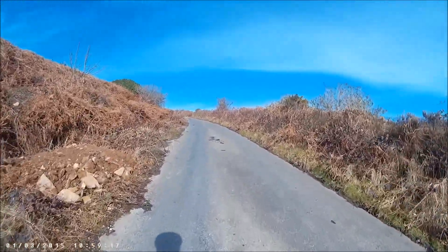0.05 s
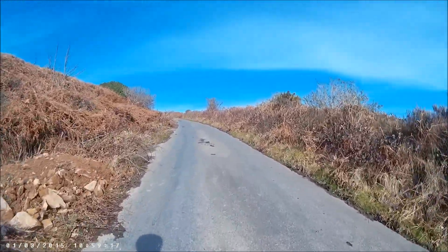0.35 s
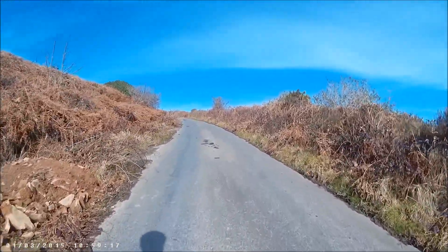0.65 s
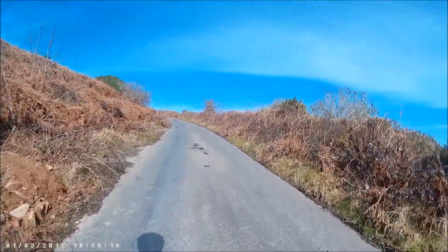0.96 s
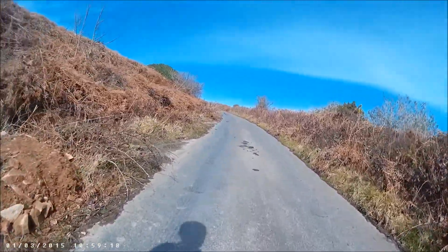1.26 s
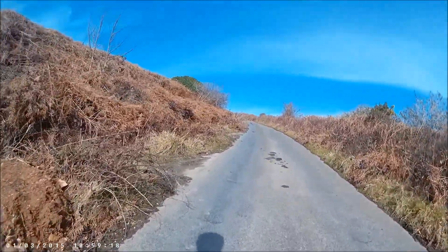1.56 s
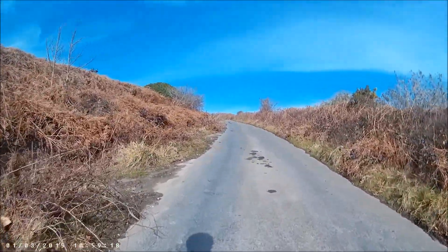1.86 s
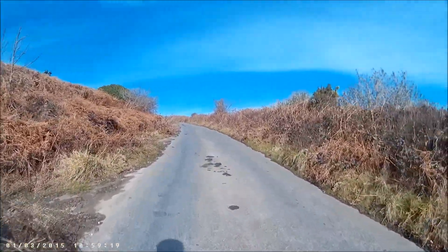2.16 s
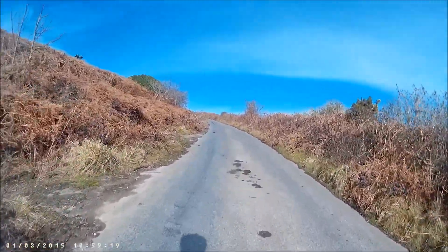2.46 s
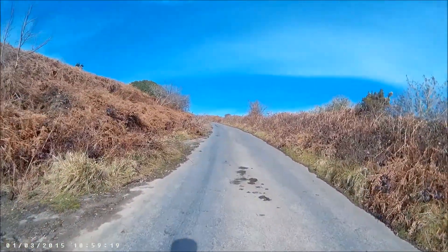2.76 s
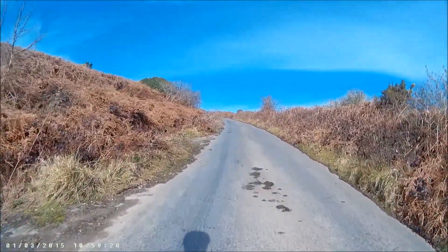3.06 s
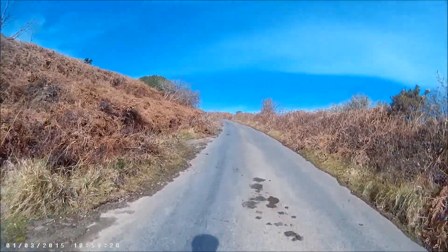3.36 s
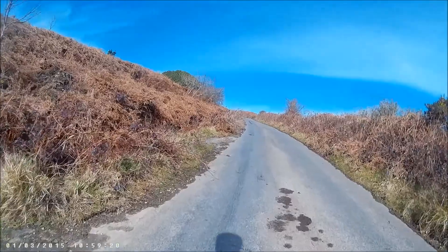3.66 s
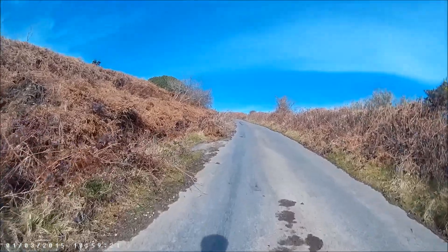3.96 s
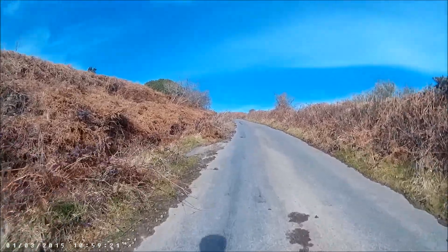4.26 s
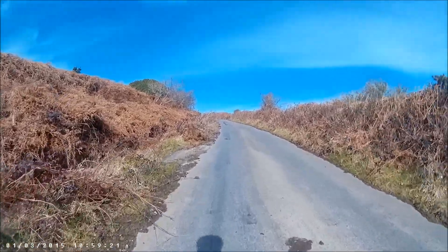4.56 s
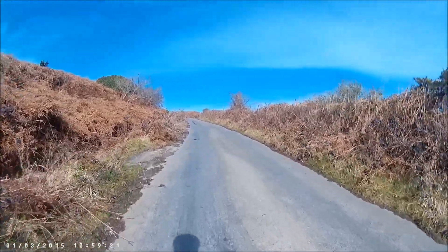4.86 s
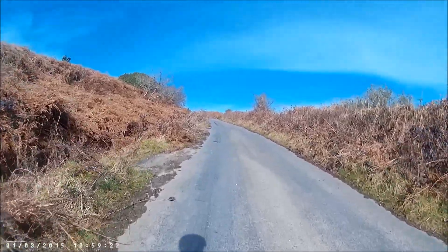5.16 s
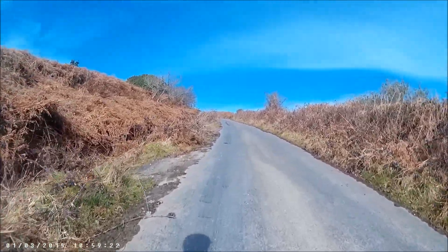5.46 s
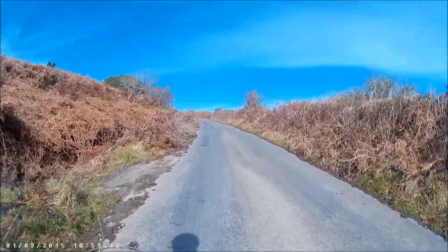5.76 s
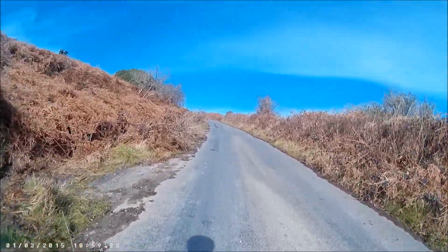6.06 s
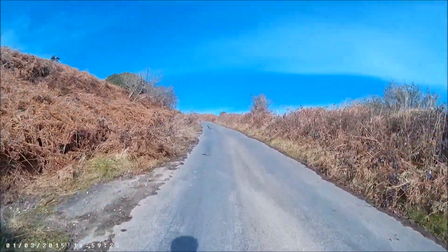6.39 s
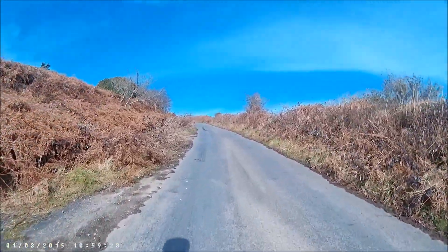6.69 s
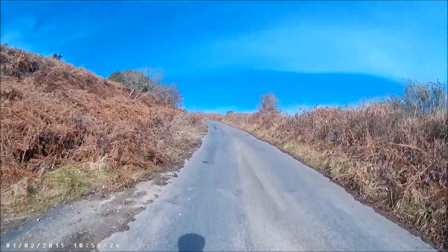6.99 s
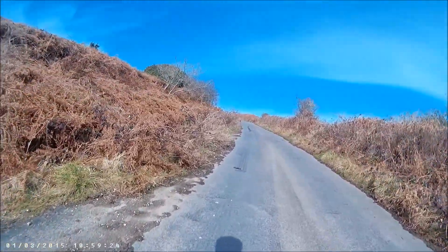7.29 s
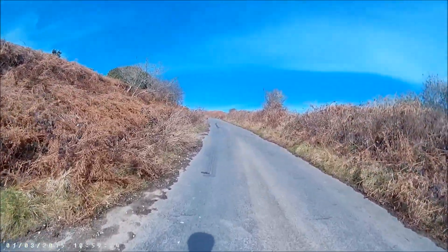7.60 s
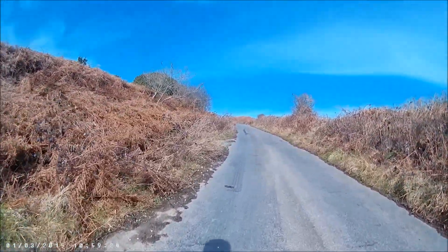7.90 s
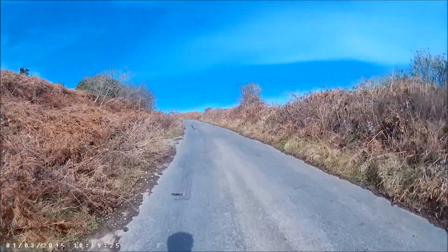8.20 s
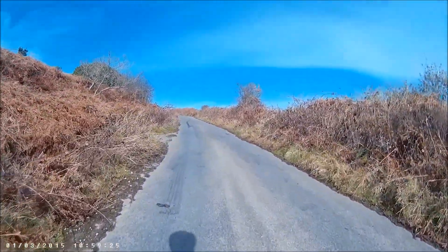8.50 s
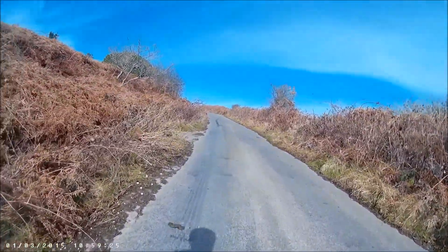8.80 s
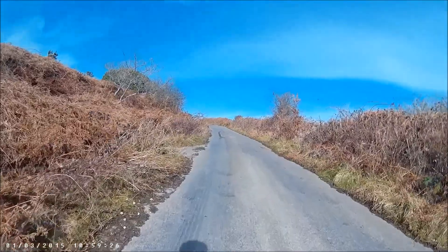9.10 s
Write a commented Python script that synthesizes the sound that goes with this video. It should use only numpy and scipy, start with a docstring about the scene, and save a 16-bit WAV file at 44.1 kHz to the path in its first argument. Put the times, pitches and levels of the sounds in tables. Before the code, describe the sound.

Close, dry rumble of a bicycle shaking along a rough lane, with pattering grit, small knocks and occasional creaks.

```python
"""A rough tarmac lane, uphill, heard from a camera fixed to a slowly climbing bicycle.
The microphone rides on the frame, so everything is close and dry. The road's texture shakes
tyres, frame and mount into a deep wobble and a hollow drone, under a fine patter of grit.
Chippings knock, bumps thud, the handlebar clunks, the chain clinks and the mount creaks
now and then. Behind it all lie the camera's own faint hiss and whine."""
import sys
import numpy as np
from scipy import signal
from scipy.fft import rfft, irfft
from scipy.io import wavfile
from scipy.ndimage import uniform_filter1d

SR = 44100
rng = np.random.default_rng(int(sys.argv[2]) if len(sys.argv) > 2 else 0)


def output_pcm(signal):
    """Save a mono or channel-first signal as 16-bit PCM at the path in sys.argv[1].

    Samples are clipped to [-1, 1] before scaling.
    """
    pcm = np.clip(np.atleast_2d(signal).T, -1, 1) * 32767
    wavfile.write(sys.argv[1], SR, np.round(pcm).astype(np.int16))


N = 411894
TIME = np.arange(N) / SR
HZ = np.fft.rfftfreq(16384, 1 / SR)  # frequency grid of the resonances

# resonances of the chain's links: pitch_hz, width_hz, gain_db
CHAIN_MODES = [(2756, 89, 9), (2960, 210, -6.5), (3610, 76, 7.5), (4060, 180, -6.5), (5700, 180, -5)]


def rolling(effort_db):
    """The tarmac shakes the bicycle: it bounces on its tyres, and frame, handlebar and mount drone."""
    # resonances: pitch_hz, width_hz, gain_db
    tyre_modes = [(38.9, 6.8, 7), (56, 60, -22)]
    flex_modes = [(72.4, 40, -2.5), (125.5, 26, -1), (159, 44, -4.5)]  # the frame's deepest flexing
    frame_modes = [(179, 31, -10.5), (212.7, 20, -3.5), (240.1, 12.7, -3), (261.8, 23.5, 1.5),
                   (300.1, 23.2, -8), (355.7, 36, -15.5)]  # its low bending
    bar_modes = [(404, 68, -9), (457.2, 14.8, 1.5), (467, 46, 0.5)]
    mount_modes = [(609.5, 7.7, -0.5), (624.8, 56, 2.5), (662, 60, -18), (736.5, 47, -5.5)]
    # lurches on the tyres: centre_s, level_db, length_s
    lurches = [(0.494, -24.5, 0.31), (0.976, -22.5, 0.31), (1.395, -19.5, 0.35), (1.91, -25.5, 0.36),
               (2.21, -23, 0.17), (2.524, -24.5, 0.48), (2.798, -22.5, 0.17), (3.037, -29.5, 0.63),
               (4.06, -28.5, 0.47), (4.492, -29.5, 0.44), (5.27, -31, 0.12), (5.903, -27, 0.16),
               (6.564, -31, 0.16), (7.073, -28, 0.24), (7.54, -32.5, 0.13), (8.114, -29.0, 0.12),
               (8.646, -29, 0.26), (8.872, -20, 0.28)]
    # spells of handlebar buzz: centre_s, lift_db, length_s
    buzzes = [(1.04, 7.5, 0.36), (2.297, 7, 0.52), (6.072, 7.0, 0.3)]
    sway = gain_of(-33.5) + sum(gain_of(db) * swell(s, length) for s, db, length in lurches)
    wobble = sway * shaken(rng.standard_normal(N), tyre_modes, window=8000)
    buzz_db = sum(db * swell(s, length) for s, db, length in buzzes)
    road = stones(per_s=1800, spread_db=2.5)
    # each part has a base level and follows its own share of the effort
    flex = gain_of(-40.5 + 0.53 * effort_db) * shaken(road, flex_modes, window=6000)
    frame = gain_of(-32.5 + effort_db) * shaken(road, frame_modes, window=4000)
    bar = gain_of(-44.5 + 0.78 * effort_db + buzz_db) * shaken(road, bar_modes, window=4000)
    mount = gain_of(-45 + 0.94 * effort_db) * shaken(road, mount_modes, window=4000)
    return wobble + flex + frame + bar + mount


def effort():
    """How hard the road shakes the bicycle, in dB: pace, surges and the wheel's unevenness."""
    # slow trend of the climb: time_s, level_db
    pace = [(0, 2.6), (0.3, -0.9), (1.3, 3.5), (2.5, 3.5), (3.35, -2), (4.4, -5), (5.1, -1), (6.4, -0.7),
            (6.9, -2.2), (7.5, -0.4), (8.4, -2.6), (9.34, 3)]
    # pedal pushes and coarser tarmac: centre_s, lift_db, length_s
    surges = [(0.01, 5, 0.26), (0.806, 2, 1), (1.206, 3, 0.4), (1.623, 4, 0.21), (1.885, 0, .2),
              (2.398, 5, 0.45), (3.048, 6.5, 0.68), (3.677, 6.5, 0.66), (4.21, 8.5, 0.95),
              (4.578, 10.5, 0.2), (4.842, 8, 0.44), (5.453, 4.5, 0.42), (6.192, 4, 0.66), (6.57, 6, 0.2),
              (6.806, 3.5, 0.098), (7.353, 5, 0.86), (7.82, 2, 0.24), (8.1, 9, 0.25), (8.426, 6.5, 0.13),
              (8.808, 5.5, 0.6)]
    surge_db = sum(db * swell(s, length) for s, db, length in surges)
    coarse_time = TIME[::256]
    rates_hz = np.geomspace(2.5, 11, 30)
    ripple = sum(np.sin(2 * np.pi * (hz * coarse_time + rng.random())) / np.sqrt(hz) for hz in rates_hz)
    uneven_db = unit_rms(np.interp(TIME, coarse_time, ripple))
    return np.interp(TIME, *np.transpose(pace)) + surge_db + uneven_db


def grit(effort_db):
    """Fine chippings patter into the camera case; tread hiss and chain rattle rise with the effort."""
    # resonances: pitch_hz, width_hz, gain_db
    case_modes = [(964, 260, -6), (1109, 43, -0.5), (1258, 105, 0), (1411, 62, 0.5), (1481, 57, 1.5),
                  (1702, 490, -11), (2880, 150, -18), (3560, 320, -45)]
    tread_modes = [(3100, 290, -3.5), (3800, 750, -3), (5230, 3500, -8), (9000, 6600, -11.5)]
    # loose grit along the lane, lifting all three sounds: time_s, lift_db
    loose_grit = [(0, 3.5), (.35, -1), (.58, 2.5), (.9, 1.5), (1.3, 0), (2.3, .5), (2.7, 0), (3.35, -1.5),
                  (3.9, 1), (4.5, 0), (5.45, -1), (6.3, 1.5), (6.95, 0.5), (7.85, 0.5), (8.3, -2),
                  (8.65, 0), (8.88, 2), (9.34, 0)]
    grains = stones(per_s=1500, spread_db=3)
    patter = gain_of(-53.5 + 0.88 * effort_db) * shaken(grains, case_modes, window=6000)
    tread = gain_of(-71) * shaken(stones(per_s=6000, spread_db=3.5), tread_modes, window=6000)
    chain = gain_of(-76.5) * shaken(stones(per_s=170, spread_db=8), CHAIN_MODES, window=20000)
    lift = gain_of(np.interp(TIME, *np.transpose(loose_grit)))
    return lift * (patter + gain_of(effort_db) * (tread + chain))


def knocks(rebound=0.62, rebound_s=0.001125, small_per_s=1.5):
    """Chippings strike, small ones at random: each a hard contact and three quick, dying rebounds."""
    # the larger chippings: start_s, relative_db, treble_db
    large_chips = [(0.211, -34.5, -8), (0.5204, -31, -9), (0.5555, -26, 2.5), (0.6489, -35, -13),
                   (0.85, -33.5, -5), (1.1163, -34, -15), (1.1495, -34, -16), (1.744, -35.5, -3),
                   (1.777, -37.5, 9), (1.94, -37, 1), (2.3986, -27.5, 3.5), (2.54, -30.5, -5),
                   (2.6454, -38, -8), (3.0113, -27, -14), (3.0568, -24.5, 3.5), (3.6237, -31.5, -2.5),
                   (3.7854, -35.5, -1), (4.2637, -31.5, -4), (4.554, -35, -10), (4.8766, -32.5, 0),
                   (5.168, -39, -1), (5.527, -29.5, 1), (5.7731, -33.5, -14), (6.1734, -34, 0),
                   (6.3008, -33.5, 7), (6.781, -32.5, 4.5), (7.3175, -38, -9), (7.4864, -34, -13),
                   (7.83, -39, -6), (8.1064, -30.5, 1), (8.3729, -38.5, -4), (8.648, -36.5, -5),
                   (8.6925, -28, 3), (9.307, -31, -2)]
    # resonances of a sharp knock: pitch_hz, width_hz, gain_db
    knock_modes = [(307, 94, 13), (580, 350, 3.5), (1182, 124, 3), (1450, 124, 4), (2003, 110, -7),
                   (2900, 230, -12.5), (3770, 360, -19.5), (4560, 400, -33), (6130, 2200, -22.5)]
    out = np.zeros(N)
    scatter = rng.uniform(-1, 1, (150, 4))
    small_count = round(small_per_s * N / SR)
    small_chips = [(rng.uniform(0, N / SR), rng.uniform(-42, -38), -6) for _ in range(small_count)]
    for (s, db, treble_db), (detune, *jitter) in zip(large_chips + small_chips, scatter):
        hit = ring(knock_modes, 1 + 0.043 * detune, treble_db, top_hz=4300)
        clack = hit.copy()
        gaps_s = rebound_s * (1 + 0.5 * np.array(jitter))
        for bounce, delay_s in enumerate(np.cumsum(gaps_s), 1):
            add(clack, delay_s, rebound ** bounce * hit)
        add(out, s + 0.000827, at_peak(clack, db + 8.5))
    return out


def road_bumps():
    """Bumps in the lane send low thuds through the bicycle."""
    # bumps: start_s, relative_db
    bumps = [(0.729, -4), (3.413, -18), (4.16, -3), (4.258, -6), (7.217, -16), (8.812, -8.5), (8.84, -1.5)]
    # resonances of a thud: pitch_hz, width_hz, gain_db
    thud_modes = [(74.6, 190, -11.5), (173, 55, -11), (248, 98, -3.5)]
    return blows(bumps, thud_modes, gain_db=-10, scatter=0.044)


def handlebar_clunks():
    """Single blows ring the handlebar, short and hollow."""
    # clunks: start_s, relative_db
    clunks = [(0.27, -28.5), (1.024, -26.5), (2.538, -19.5), (2.815, -33), (3.158, -32), (3.951, -30),
              (4.152, -25.5), (4.587, -30), (6.095, -30), (6.857, -33), (8.108, -30), (8.983, -49),
              (9.007, -27)]
    # resonances of the struck bar: pitch_hz, width_hz, gain_db
    clunk_modes = [(480, 87, -34), (646, 50, 14.5), (774, 230, -3), (1420, 490, -16)]
    return blows(clunks, clunk_modes, gain_db=-1, scatter=0.1)


def mount_creaks(slips_per_s=2500, squeak_hz=5540, waver_hz=95):
    """A joint sticks and slips: uneven slips ring the mount, and a thin squeak sings as it slides."""
    # creaks: start_s, relative_db, length_s, treble_db, pitch_ratio, squeak_db
    creaks = [(0.757, -38, 0.011, -1, 1.1, -64), (0.763, -24.5, 0.015, -1, 1.03, -56),
              (2.897, -38, .012, 2, 0.99, -70), (3.001, -28.5, 0.031, -9, 1.1, -72),
              (4.13, -31, 0.018, -5, 0.98, -64), (4.142, -27, 0.025, -3, 1.09, -62),
              (5.271, -31, 0.026, 1, 1.04, -63), (6.392, -36, 0.032, 2, 1.07, -70),
              (6.415, -32, 0.024, 0, 1.05, -62), (7.52, -24.5, 0.011, -16, 1.07, -55),
              (7.532, -25, 0.028, -4, 1.08, -55), (7.554, -26.5, 0.0325, -13, 1.054, -68),
              (8.672, -35, 0.009, 5, 1.1, -70), (8.778, -26, 0.021, 3, 1.06, -58)]
    # resonances of a creak: pitch_hz, width_hz, gain_db
    creak_modes = [(934, 260, -9), (1240, 56, 7), (1363, 146, -0.5), (1830, 280, -12), (2745, 230, -12),
                   (3470, 160, -15), (4030, 1000, -26.5)]
    out = np.zeros(N)
    for s, db, length, treble_db, pitch, squeak_db in creaks:
        count = int(length * SR)
        stroke = signal.windows.tukey(count, 0.27)
        slips = (rng.random(count) < slips_per_s / SR) + 0.012 * rng.standard_normal(count)
        easing = np.linspace(1, 0.82, count)  # the first slips release the most strain
        friction = (slips - slips.mean()) * stroke * easing
        rasp = signal.fftconvolve(friction, ring(creak_modes, pitch, treble_db, top_hz=4400))
        add(out, s, at_peak(rasp, db - 1))
        waver = unit_rms(uniform_filter1d(rng.standard_normal(count), size=60))
        hz = squeak_hz * pitch ** 0.45 + waver_hz * waver  # partly follows the creak's pitch
        add(out, s, gain_of(squeak_db) * stroke * np.sin(2 * np.pi * np.cumsum(hz) / SR))
    return out


def metal_clinks():
    """Light contacts on metal: a few bright ticks and the chain's fainter clinks."""
    # contacts: start_s, relative_db
    ticks = [(0.1101, -51.5), (6.3051, -44.5), (7.5857, -53)]
    clinks = [(1.0221, -48), (1.6187, -48), (2.0931, -49), (2.7237, -53), (5.2061, -49), (5.9894, -49),
              (7.0828, -48), (8.4208, -52)]
    # resonances of a tick: pitch_hz, width_hz, gain_db
    tick_modes = [(1450, 230, 7), (3070, 140, -2.5), (3580, 250, -5), (5700, 210, -3.5), (6600, 530, -14),
                  (7400, 500, -16)]
    return blows(ticks, tick_modes, gain_db=15) + blows(clinks, CHAIN_MODES, gain_db=-2.5)


def camera_noise(effort_db, hiss_db=-63.5):
    """Even microphone hiss and a thin electronic whine that swells with the shaking."""
    # spectrum of the hiss: frequency_hz, relative_db
    hiss_spectrum = [(100, -7), (2400, 4), (4500, 0.5), (7000, -0.5), (10000, -1.5), (14500, -0.5),
                     (16000, -10)]
    # evenly spaced lines of the whine: pitch_hz, relative_db
    whine_lines = [(9047, -112), (9120, -83), (9193, -104), (9265, -86), (9338, -86), (9410, -94),
                   (9483, -83), (9556, -79), (9628, -84), (9701, -99), (9774, -95)]
    corner_hz, corner_db = np.transpose(hiss_spectrum)
    log_hz = np.log(np.fft.rfftfreq(N, 1 / SR) + 1)
    colour = gain_of(np.interp(log_hz, np.log(corner_hz), corner_db))
    hiss = gain_of(hiss_db) * unit_rms(irfft(rfft(rng.standard_normal(N)) * colour, N))
    whine = sum(gain_of(db) * np.sqrt(2) * np.sin(2 * np.pi * (hz * TIME + rng.random()))
                for hz, db in whine_lines)
    return hiss + whine * gain_of(0.69 * (effort_db - effort_db.mean()) - 1.5)


def ring(modes, pitch=1, treble_db=0, top_hz=16000):
    """Impulse response of a resonant body; a contact of finite length excites little above top_hz."""
    power = sum(gain_of(db) ** 2 / (1 + ((HZ - hz * pitch) / (0.7 * width)) ** 2) ** 2
                for hz, width, db in modes)
    lift = gain_of(treble_db * np.clip(np.log2((HZ + 1) / 1600), 0, 1))
    softness = 1 / np.sqrt(1 + (HZ / top_hz) ** 18)
    cepstrum = irfft(np.log(np.sqrt(power) * lift * softness + 1e-7))
    # minimum phase: nothing rings before the strike
    half = len(cepstrum) // 2
    cepstrum[1:half] *= 2
    cepstrum[half + 1:] = 0
    fade = signal.windows.tukey(2 * half, 0.5)[half:]
    return irfft(np.exp(rfft(cepstrum)))[:half] * fade


def stones(per_s, spread_db):
    """Random contacts: mostly small, a few large."""
    size = gain_of(spread_db * np.minimum(rng.exponential(1, N), 4))
    return size * rng.choice([-1, 1], N) * (rng.random(N) < per_s / SR)


def shaken(drive, modes, window):
    """A body under steady shaking, held near rms 1 over a sliding window of samples."""
    lead_in = len(HZ)
    ringing = signal.oaconvolve(np.pad(drive, (lead_in, 0), "wrap"), ring(modes))[lead_in:][:N]
    power = uniform_filter1d(uniform_filter1d(ringing ** 2, window), window)
    return ringing / np.sqrt(power + 1e-20)


def blows(rows, modes, gain_db, scatter=0):
    """Single blows ring one body; scatter detunes each at random."""
    out = np.zeros(N)
    for (s, db), detune in zip(rows, rng.uniform(-1.7, 1, len(rows))):
        hit = ring(modes, pitch=1 + scatter * detune, top_hz=8000)
        add(out, s, at_peak(hit, db + gain_db))
    return out


def swell(centre_s, length_s):
    """A smooth rise and fall, 1 at the top."""
    out = np.zeros(N)
    count = max(16, int(length_s * SR))
    first = round(centre_s * SR) - count // 2
    add(out, first / SR, np.hanning(count)[max(0, -first):])
    return out


def gain_of(db):
    """Decibels to amplitude."""
    return 10 ** (np.asarray(db) / 20)


def unit_rms(x):
    """Scales to rms 1."""
    return x / np.sqrt(np.mean(x ** 2) + 1e-20)


def at_peak(x, db):
    """Scales to a peak of db."""
    return gain_of(db) * x / abs(x).max()


def add(mix, start_s, sound):
    """Mixes a sound in at start_s."""
    part = mix[max(0, round(start_s * SR)):][:len(sound)]
    part += sound[:len(part)]


def scene():
    """Everything reaches the one microphone through the frame, with no room."""
    effort_db = effort()
    jolts = handlebar_clunks() + road_bumps() + metal_clinks()
    road = rolling(effort_db) + grit(effort_db) + knocks()
    return (road + jolts + camera_noise(effort_db) + mount_creaks())[None]


def record(dry, low_hz=17, high_hz=15600):
    """The camera's microphone sheds the deepest bass and the highest treble."""
    bass_cut = signal.butter(2, low_hz, "high", fs=SR, output="sos")
    treble_cut = signal.firwin(255, high_hz, window=("kaiser", 8), fs=SR)
    return signal.oaconvolve(signal.sosfilt(bass_cut, dry), treble_cut[None], "same")


dry = scene()
out = record(dry)
output_pcm(out)
```